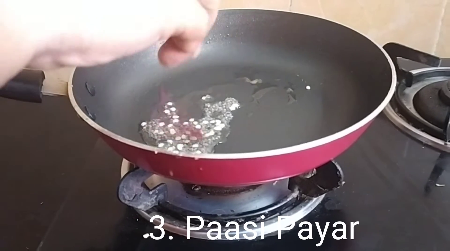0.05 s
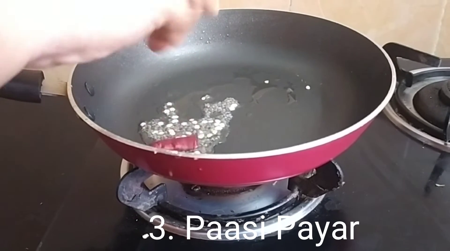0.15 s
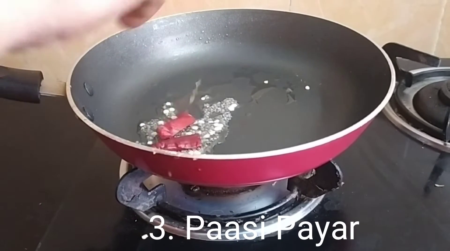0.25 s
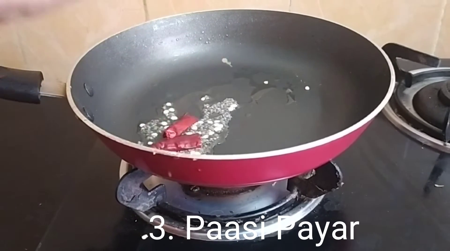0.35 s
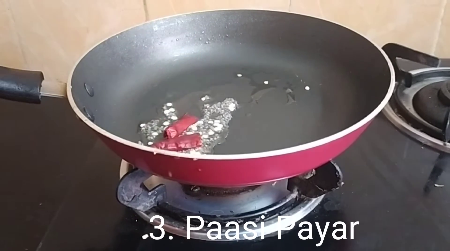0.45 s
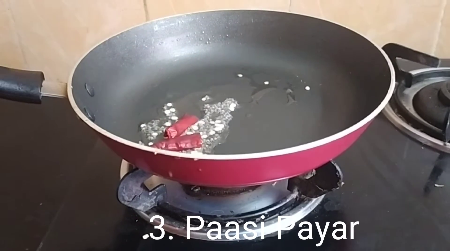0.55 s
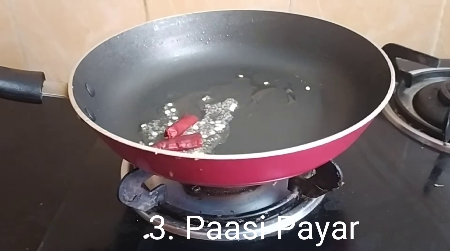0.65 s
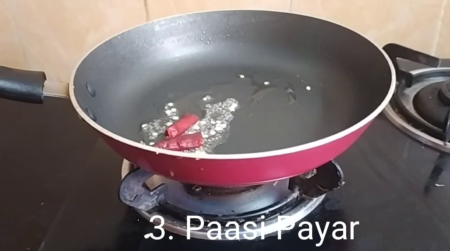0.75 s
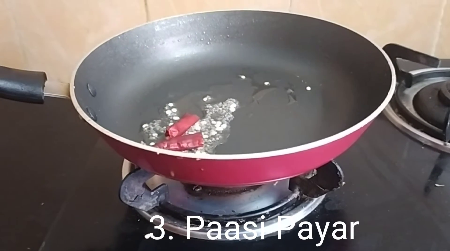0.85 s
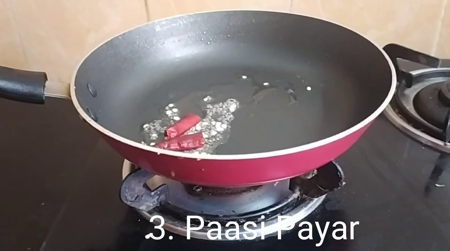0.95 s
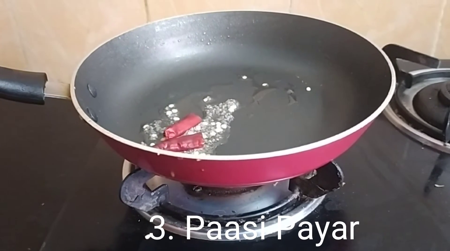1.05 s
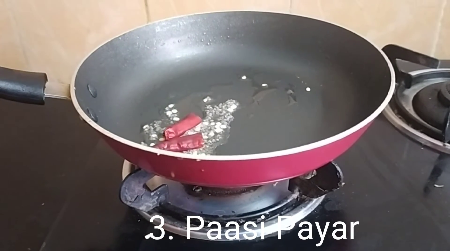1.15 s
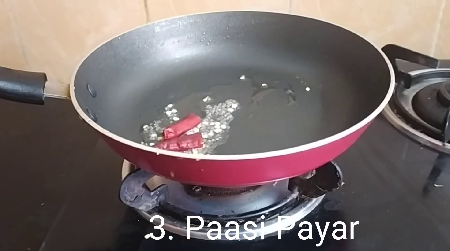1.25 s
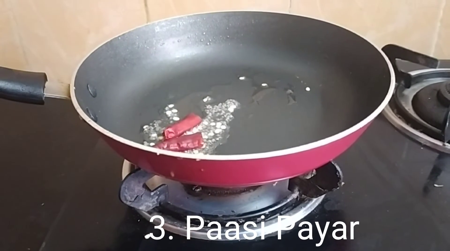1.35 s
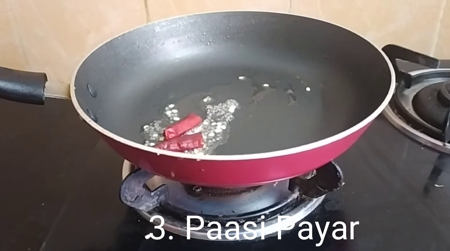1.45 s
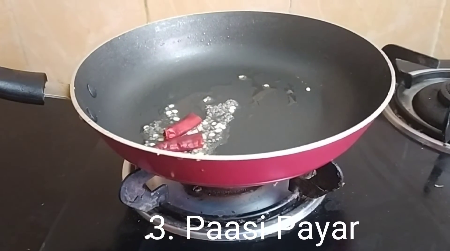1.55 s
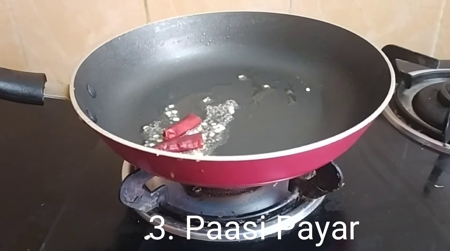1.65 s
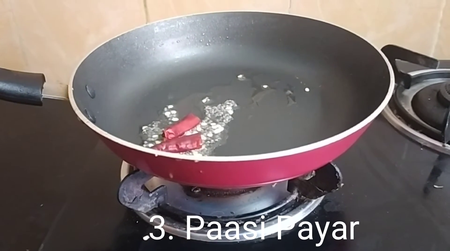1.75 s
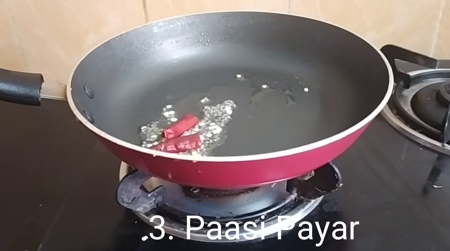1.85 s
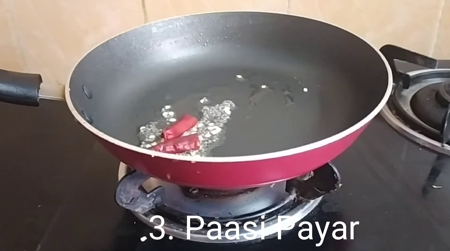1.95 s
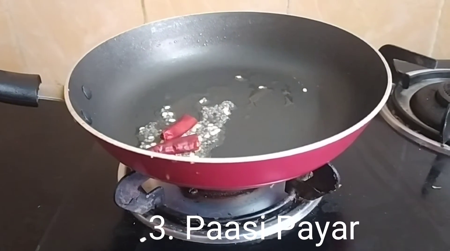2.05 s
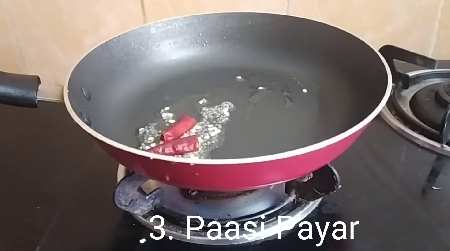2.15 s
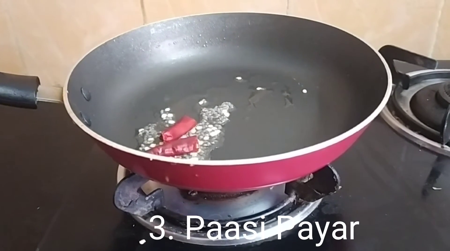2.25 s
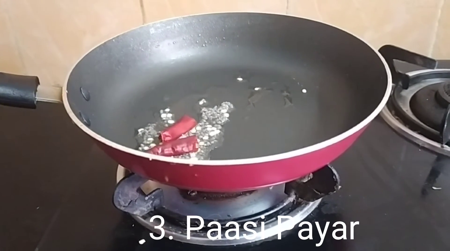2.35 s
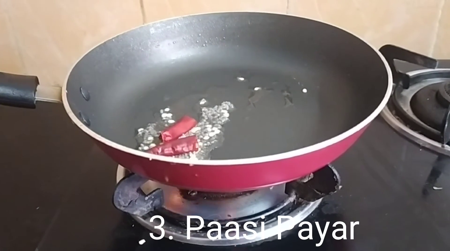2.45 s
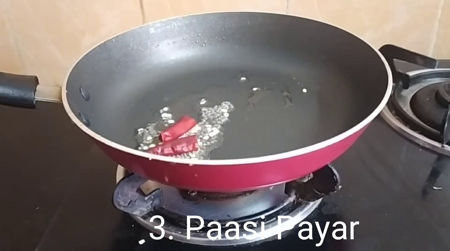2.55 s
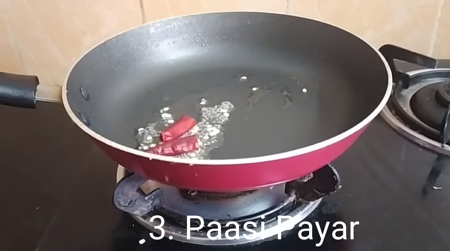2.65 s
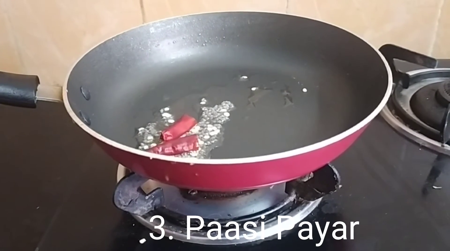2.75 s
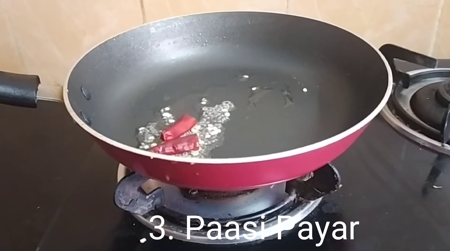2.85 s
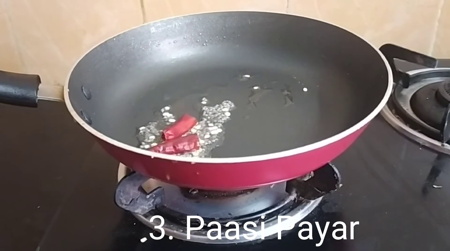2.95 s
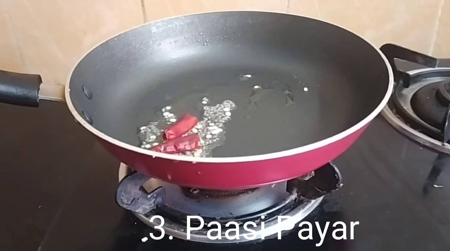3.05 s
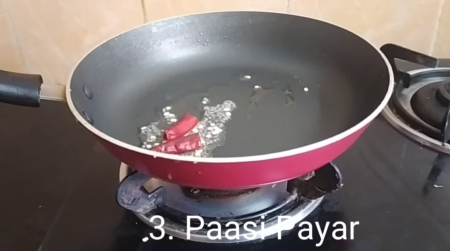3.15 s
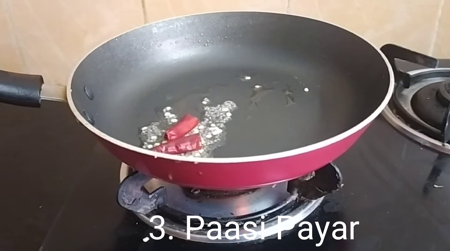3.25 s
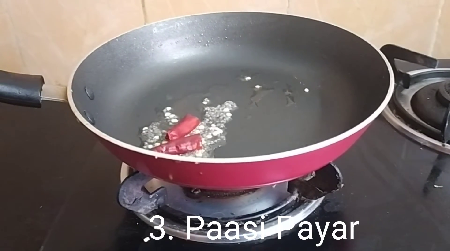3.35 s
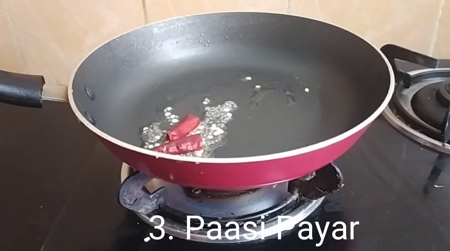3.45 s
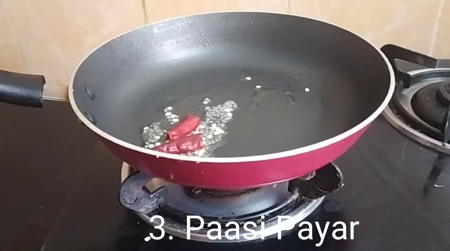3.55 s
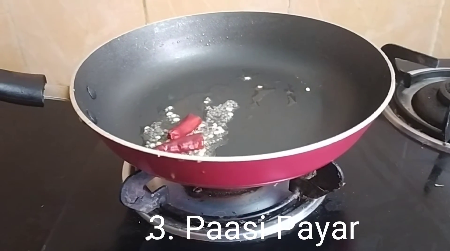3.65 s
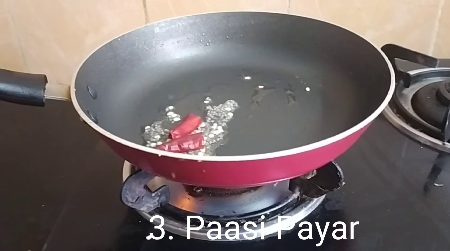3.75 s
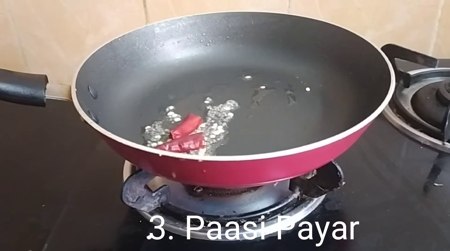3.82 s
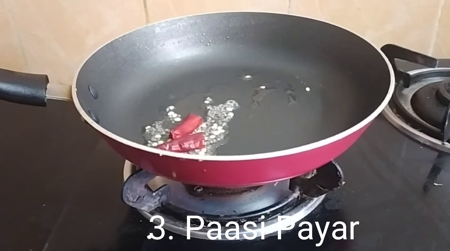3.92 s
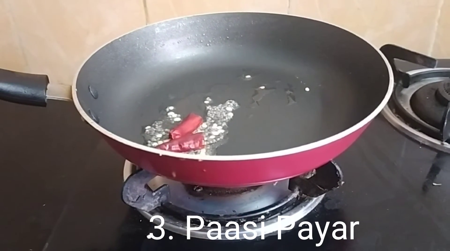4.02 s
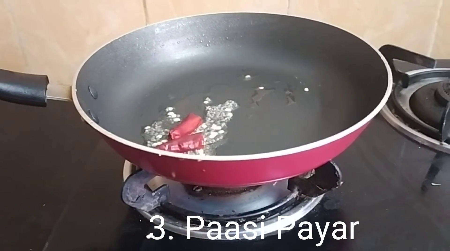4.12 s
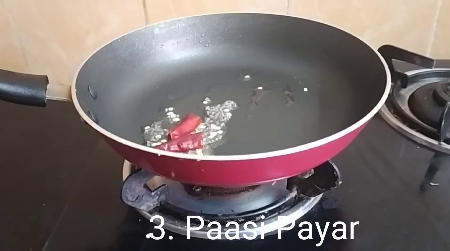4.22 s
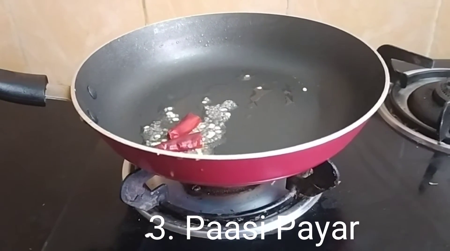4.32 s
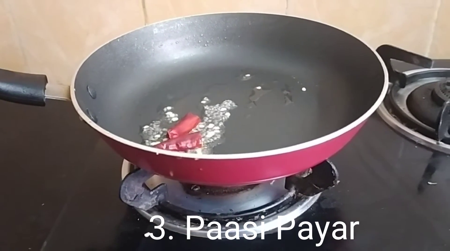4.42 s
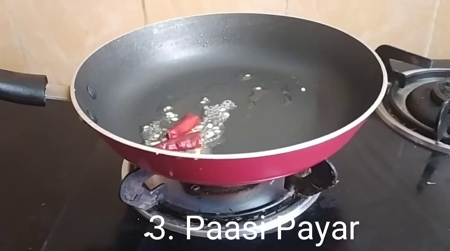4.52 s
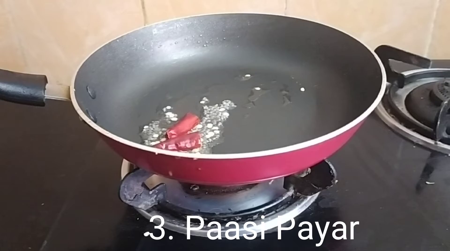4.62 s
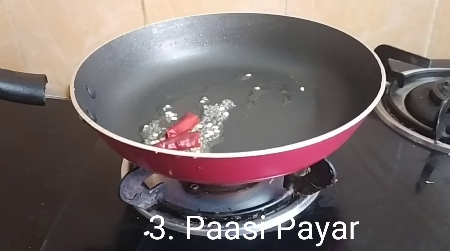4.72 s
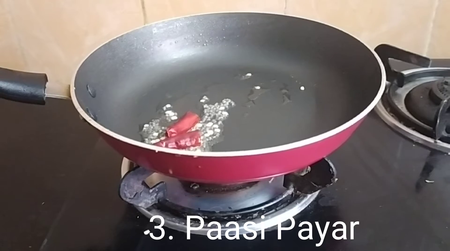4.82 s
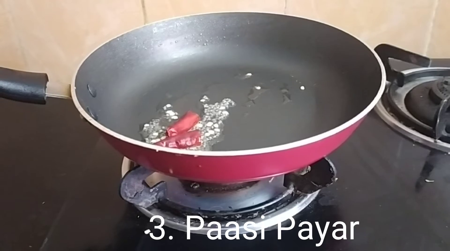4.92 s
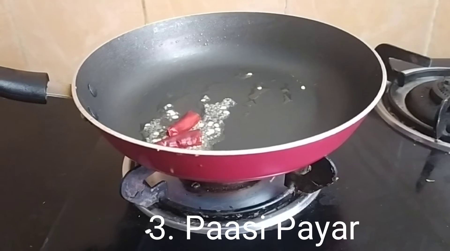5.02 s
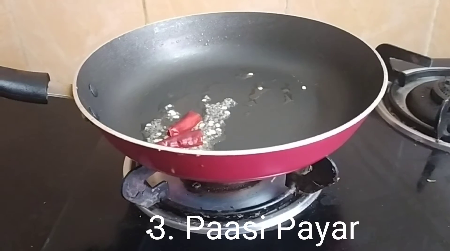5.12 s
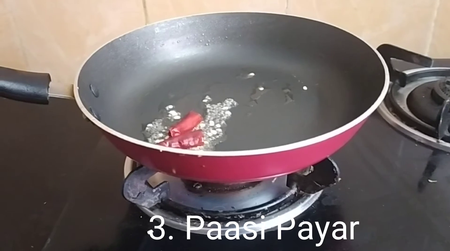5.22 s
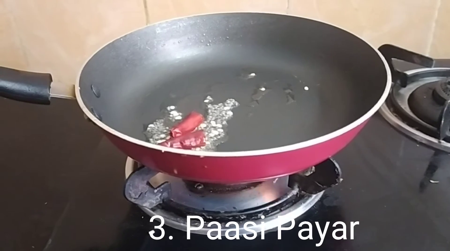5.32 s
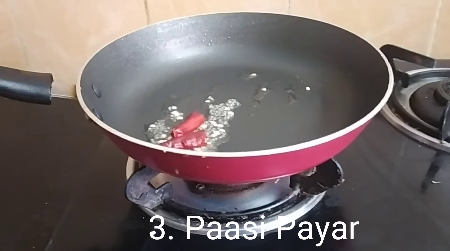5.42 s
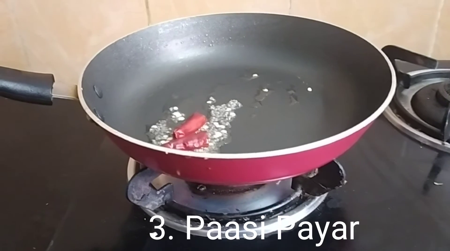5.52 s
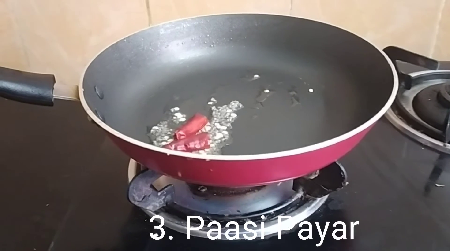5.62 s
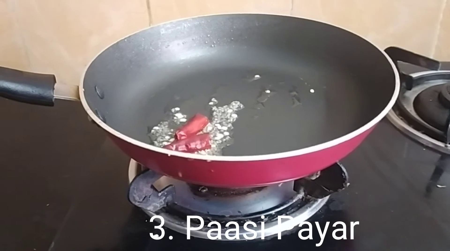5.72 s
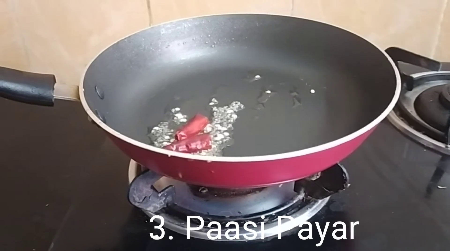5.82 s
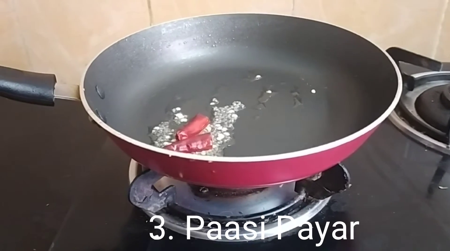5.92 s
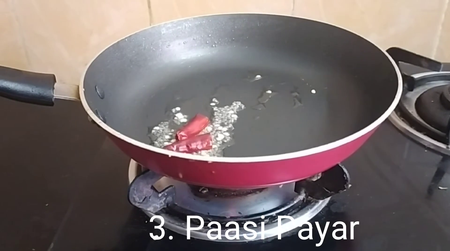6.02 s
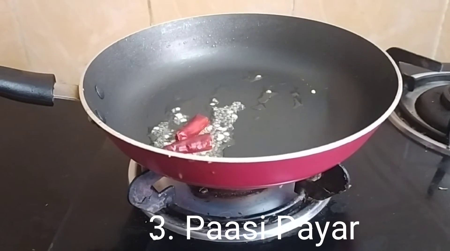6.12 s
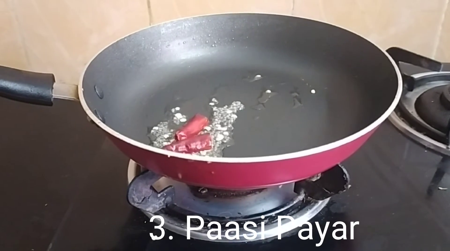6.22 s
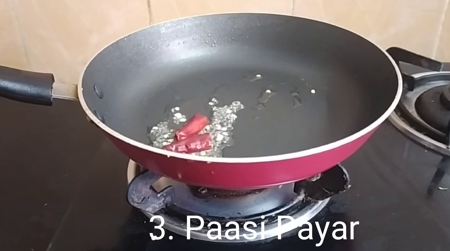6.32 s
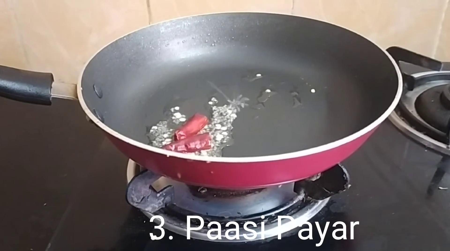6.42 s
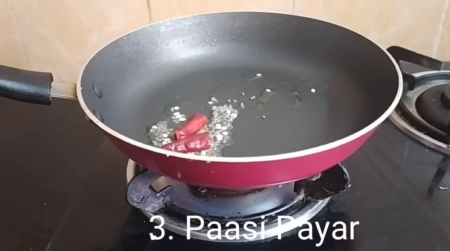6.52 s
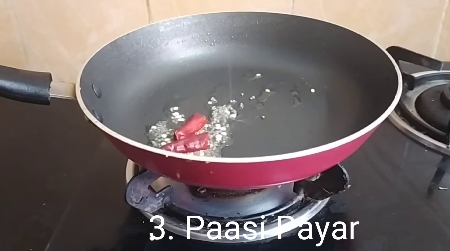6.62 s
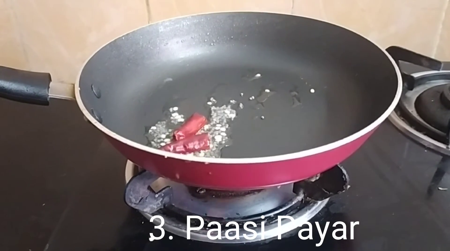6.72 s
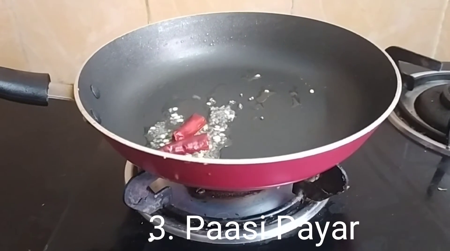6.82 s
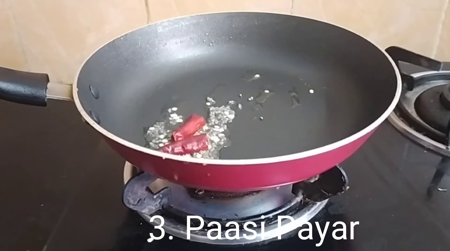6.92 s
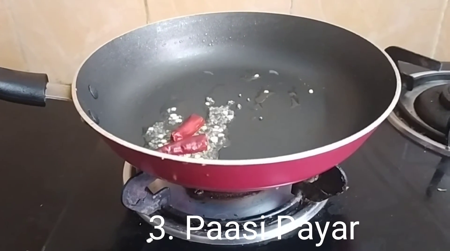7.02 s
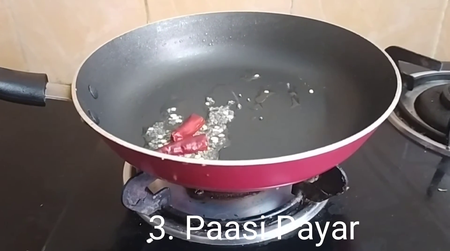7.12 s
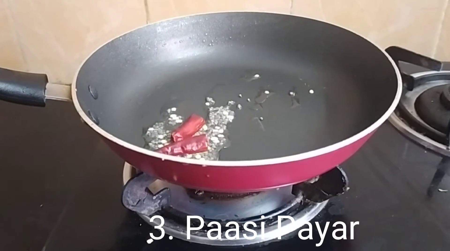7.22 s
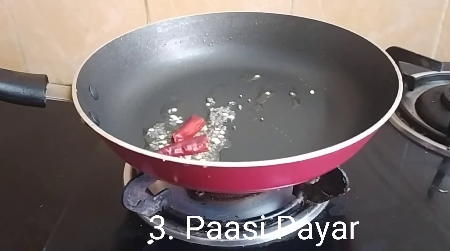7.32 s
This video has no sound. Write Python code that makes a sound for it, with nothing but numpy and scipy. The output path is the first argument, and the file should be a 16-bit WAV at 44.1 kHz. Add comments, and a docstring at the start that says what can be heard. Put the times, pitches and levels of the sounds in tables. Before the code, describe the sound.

Sharp crackles and spitting oil pops over a faint fine sizzle in a frying pan, growing busier and ending with several loud snaps.

```python
"""Steam bubbles burst as sharp pops from lentils and dried chillies frying in a little oil on a gas stove.
Each pop is a millisecond noise crack in six bands; thrown drops patter back, and each pop rings the pan's modes.
Steam whistles and short pan hums are narrow-band noise; tiny bubbles make a fine fizz of patchy noise and ticks.
The flame rumbles, flutters and moans in filtered noise. In the tiled kitchen a near wall throws each pop
back before the room tail."""
import sys
import numpy as np
from scipy import signal
from scipy.fft import rfft, irfft
from scipy.io import wavfile
from scipy.ndimage import uniform_filter1d

SR = 44100
rng = np.random.default_rng(int(sys.argv[2]) if len(sys.argv) > 2 else 0)


def log_audio(samples):
    """Write samples as a 16-bit WAV file to the path given in sys.argv[1]."""
    # one column per channel
    frames = np.atleast_2d(samples).T
    # limit to full scale, then quantise
    limited = np.clip(frames, -1, 1)
    pcm = np.round(limited * 32767).astype(np.int16)
    wavfile.write(sys.argv[1], SR, pcm)


N = 324840

# Levels are relative dB; spectra are shapes, normalised on use.

# Bursting bubbles. Each row: burst time in seconds, spray level in dB, top of the spray over it in dB,
# body level in dB, body tilt in dB per octave (falling for big bubbles, rising for small),
# level of the sharp crack in dB (lower for soft sputters with a weak onset),
# blow on the pan over the low body in dB.
POPS = [(0.0333, -43, -16, -57, 3, 9, 6), (0.1095, -28, -7, -33, 8.5, -2.5, 0.5),
        (0.1386, -29, 0, -48, -10, -0.5, -0.5), (0.1735, -42, -3, -53, -9, -8, 1),
        (0.7734, -60, -7, -49, 10, -1, -4), (0.8072, -34, -4, -49, 2, 0.5, -7),
        (1.0764, -44, -6, -45.5, -1, -8, -10), (1.1356, -36, -4, -41.5, -3.5, -1.5, -3),
        (1.2213, -52, -9, -57, 21, 7, -8), (1.2532, -38.5, 6, -58.5, -8, 3.5, -2),
        (1.3024, -36, 4, -52, -3.5, 1, -1.5), (1.3926, -41, -22, -45.5, 4.5, 2, 0.5),
        (1.4109, -59, -8, -48, 5, 5, 1), (1.4252, -44.5, 5, -56, -4, 6.5, -3),
        (1.4635, -41, 12, -55, -1, -1, -5), (1.5768, -41.5, -8, -56, 6, 1.5, -8),
        (1.6062, -46, -14, -45.5, 5.5, 2.5, 1.5), (1.6347, -44, 7, -68, 4, -3, -8),
        (1.816, -43, 3, -62, 3, -2, -8), (2.008, -40, -1, -57, 10, 2, -8),
        (2.0313, -38.5, 11.5, -53, 5, 0, -6), (2.3136, -37, -22, -58, 4, -0.5, -8),
        (2.3875, -20.5, -4, -37.5, 8, -0.5, -10), (2.58, -53, -5, -35, 2, -13, -11),
        (2.7826, -39.5, 1, -46, 11.5, -8, 2), (2.9422, -36, -4, -57, 19, 2, -8),
        (3.1078, -32.5, 0.5, -48.5, 14, -0.5, -8), (3.1991, -38.5, 5.5, -36, 8, 0.5, -1.5),
        (3.2384, -37, -3, -62, 1, 1.5, -8), (3.2896, -31, -8, -32.5, -14.5, -0.5, -8.5),
        (3.4402, -32, -15, -62, -5, -4, -8), (3.463, -36, -2, -47, -4, -5.5, -8),
        (3.5537, -42, -16, -43, -9, -5, -10.5), (3.6972, -41.5, -15, -49, 6, 2, -2),
        (3.9559, -32.5, -15, -69, -5, -2.5, -10), (4.082, -34.5, -7, -52.5, 5, 1.5, -5),
        (4.2034, -30, -26, -41, 8, -1, -3), (4.4548, -44, 1, -50, -11.5, -3.5, -8.5),
        (4.6262, -31.5, -1, -47.5, 9, -2.5, -3), (4.761, -46, -11, -35, -5, -8, -8),
        (4.8299, -23, -10, -35.5, 3, -0.5, -12), (4.8504, -47, -8, -44.5, -2, -1, -5),
        (4.873, -30.5, -8, -51, 3, 2, -8), (4.9727, -26.5, -13, -36, -7.5, -10, -13.5),
        (5.2024, -33.5, 2, -55.5, -6, -1.5, -5), (5.2524, -38, 1, -49.5, -14, -5.5, -11.5),
        (5.3317, -40, -11, -42, -3.5, 0, -9.5), (5.3902, -32, 0.5, -45.5, 2, 0, -8),
        (5.4822, -39, -9, -52.5, -11, -6, -12), (5.5548, -34, -1, -41.5, 2.5, 0, -10),
        (5.6865, -38, -18, -53.5, -22, -5.5, -21), (5.7848, -41, -8, -53, -7, -8, -8),
        (5.8368, -39.5, 4.5, -35.5, 5, 1.5, -8.5), (5.881, -40, -2, -53, -6, 2, -8),
        (5.917, -36, 5, -51, -13, -3, -13), (5.9594, -43, 0, -53, -18, -4, -14),
        (6.127, -34.5, -1, -53, 4, 3.5, -5), (6.1577, -31, -15, -47.5, 7, 1, -11),
        (6.2884, -10, -7.5, -26, -2, -1.5, -14), (6.4745, -10, -9, -24.5, -2, -1, -15),
        (6.728, -44, 1, -48.5, 7, 0, 3), (6.8062, -18.5, -3, -31, 1.5, 0.5, -11),
        (6.9494, -56, -8, -54, -8, -2, -5), (7.08, -39, -9, -57, -2, -6, -8),
        (7.1468, -10.5, -16, -24.5, 1, 0.5, -19), (7.316, -19.5, 3, -29.5, 3.5, 1.5, -17)]
# Pop bands: puff, three of body, spray, top of the spray. Each row: low edge in Hz, high edge in Hz.
BAND_EDGES_HZ = [(40, 1000), (1000, 3000), (3000, 4700), (4700, 6500), (6500, 11500), (11500, 17000)]
# Spectrum of a pop. Each row: frequency in Hz, density in dB per Hz.
POP_COLOUR = [(60, -31), (500, -34), (1100, -31), (2250, -16.5), (2750, -18), (3300, -17), (4100, -4),
              (5200, -3), (9000, 4.5), (11500, 2), (13500, -13.5), (16600, -26), (17200, -60)]
# The three body bands, in octaves from the middle of the body.
BODY_OCTAVES = np.log2(np.array([2200, 3900, 5600]) / 3600)
# Near wall echoes. Each row: delay in seconds, level in dB. The first path is four metres further.
ECHOES = [(.0119, 3), (.0215, -7), (.037, -6)]
# Share of each pop band that the walls throw back, as amplitude ratios.
WALL_SHARES = np.array([0.79, 0.062, 0.13, 0.31, 0.75, 0.41])
# Modes of the pan bottom. Each row: frequency in Hz, level in dB, t60 in seconds.
PAN_MODES = [(760, -45, 0.22), (1448, -18, 0.14), (2273, -10.5, 0.15), (2440, -13, 0.16),
             (3473, -3.5, 0.043), (4005, -1, 0.023), (4050, -29, 0.016)]
# Steam whistles and sputters, and short narrow hums of the ringing pan.
# Each row: start in seconds, length in seconds, pitch in Hz, width in Hz, level in dB.
WHISTLES_AND_HUMS = [(0.111, 0.019, 5950, 3950, -43), (0.111, 0.059, 760, 60, -60),
                     (2.146, 0.016, 8160, 302, -53.5), (2.548, 0.088, 2180, 603, -54.5),
                     (2.966, 0.029, 7900, 300, -51.5), (3.46, 0.11, 7900, 300, -62.5),
                     (4.017, 0.052, 8100, 300, -56), (4.867, 0.063, 7850, 300, -48),
                     (4.97, 0.027, 2220, 1500, -49), (4.971, 0.021, 9700, 3500, -41.5),
                     (5.256, 0.038, 7870, 300, -51), (5.3, 0.021, 8240, 300, -39),
                     (5.28, 0.064, 12000, 400, -52), (5.422, 0.036, 7950, 300, -53),
                     (5.679, 0.032, 2020, 500, -61.5), (5.951, 0.032, 1493, 60, -62.5),
                     (6.562, .18, 8180, 500, -50), (7.092, 0.032, 8230, 352, -37.5)]
# Fizz level. Each row: time in seconds, level in dB.
FIZZ_LEVEL = [(0.0, -48), (0.31, -57), (1.2, -54), (1.82, -56.5), (2.48, -54), (3.55, -56.5), (4.1, -54),
              (4.4, -57), (4.84, -53.5), (5.56, -57), (6.22, -53.5), (6.73, -54.5), (6.89, -60.5),
              (7.14, -53), (7.37, -50)]
# Spectrum of the fizz. Each row: frequency in Hz, density in dB per Hz.
FIZZ_COLOUR = [(530, -89), (900, -19), (1780, -15), (2280, -10), (3090, -19), (4100, -9.5), (4690, -14),
               (6680, -4.5), (7360, -10), (10100, -2), (11700, -8), (13600, -21), (15500, -19),
               (16100, -42), (16700, -50)]
# Flame roar. Each row: time in seconds, level in dB.
ROAR_LEVEL = [(0.0, -66.5), (1.1, -67.5), (1.41, -69.5), (1.7, -70), (2.4, -61), (2.85, -70), (3.1, -63.5),
              (3.9, -69.5), (5.8, -70), (7.37, -68)]
# Spectrum of the flame rumble. Each row: frequency in Hz, density in dB per Hz.
RUMBLE_COLOUR = [(15, -5), (28, 2.5), (50, -11), (113, -13.5), (248, -16.5), (400, -22), (530, -31),
                 (760, -21.5), (1060, -36), (1500, -22.5), (2500, -81)]
# Faint wavering hums. Each row: pitch in Hz, width in Hz, level in dB.
STEADY_HUMS = [(38.3, 10, -71.5), (71.8, 7.3, -74), (176, 18, -75.5), (247.3, 13, -76), (797, 5.6, -83.5)]
# Gusts that ruffle the gas flame. Each row: start in seconds, length in seconds, level in dB.
GUSTS = [(1.123, .13, -61.5), (1.934, 0.063, -68), (2.159, 0.094, -61), (2.294, 0.096, -56.5),
         (3.041, 0.067, -61.5), (3.138, 0.13, -60.5), (3.434, 0.14, -65.5), (4.972, 0.071, -63.5),
         (5.498, 0.083, -54), (5.56, 0.085, -60.5), (5.847, 0.16, -69.5)]
# Flame moans. Each row: start in seconds, length in seconds, pitch in Hz, level in dB.
MOANS = [(2.17, 0.21, 312, -57), (2.19, 0.16, 180, -58), (2.82, 0.14, 184, -63), (3.09, 0.14, 183, -59.5)]
# Room tail. Each row: frequency in Hz, t60 in seconds, level in dB.
KITCHEN = [(500, 0.73, -3), (1500, 0.38, -0.5), (3500, 0.43, 1), (9700, 0.44, 6), (12000, 0.53, 1),
           (16200, 0.49, 5)]

PRE_S = .002  # lead-in before a burst
PUFF_DB, ECHO_DB = -24.5, -6  # puff under the spray; wall under the pop
DULL_OCTAVES = .8  # extra fall at the top of a big bubble's body
DROPS_PER_S, DROPS_DB, DROPS_FADE_S, FLIGHT_S = 300, -17, 0.044, .011
RUMBLE_DB = -67.5
GUST_LO_HZ, GUST_HI_HZ = 265, 760
MOAN_WIDTH = 0.042  # half width, share of the pitch
EDGE_HZ = 16750


def gain_of(db):
    """Amplitude ratio of a level in dB."""
    return 10 ** (np.asarray(db) / 20)


def evened(x):
    """Scales x to rms 1."""
    return x / np.sqrt(np.mean(x ** 2, axis=-1, keepdims=True) + 1e-20)


def read(points, hz):
    """Interpolates (Hz, value) points over log frequency."""
    f, value = np.transpose(points)
    return np.interp(np.log(hz + 1), np.log(f + 1), value)


def follow(rows, column):
    """Interpolates a column of timed rows at every sample."""
    rows = np.asarray(rows)
    return np.interp(np.arange(N) / SR, rows[:, 0], rows[:, column])


def add(mix, s, sound):
    """Adds sound to mix at s seconds, cut at the end."""
    part = mix[round(s * SR):][:len(sound)]
    part += sound[:len(part)]


def band(hz, lo_hz, hi_hz, steep):
    """Gain of a band with sloping edges."""
    return 1 / np.sqrt((1 + (lo_hz / (hz + 1)) ** steep) * (1 + (hz / hi_hz) ** steep))


def coloured(x, gain):
    """Filters x by a gain that is a function of frequency; rms 1."""
    hz = np.fft.rfftfreq(x.shape[-1], 1 / SR)
    return evened(irfft(rfft(x) * gain(hz), x.shape[-1]))


def resonate(x, hz, width):
    """Shifts hz down to zero, smooths twice, and shifts back; rms 1."""
    turn = np.exp(2j * np.pi * hz * np.arange(len(x)) / SR)
    r = np.exp(-np.pi * width / SR)
    smooth = signal.lfilter([1], np.poly([r, r]), x / turn)
    return evened((turn * smooth).real)


def pops():
    """Each burst is a millisecond crack with a short spatter and a puff of pressure.

    Every pop strikes the pan, by its low body level plus its own blow level."""
    t = np.arange(1024) / SR - PRE_S
    attack = (t > 0) * (1 - np.exp(-abs(t) / 0.00029))
    decay = np.exp(-t / 0.00032) + gain_of(-12) * np.exp(-t / 0.0033)  # crack, spatter
    bursts = rng.standard_normal((len(POPS), len(t))) * attack * decay
    click = (np.arange(len(t)) == 110) * 1.
    colours = [lambda hz, edges=edges: band(hz, *edges, 16) * gain_of(read(POP_COLOUR, hz))
               for edges in BAND_EDGES_HZ]
    cracks = gain_of(-18.5) * np.stack([coloured(bursts, colour) for colour in colours], axis=1)
    clicks = gain_of(-17.5) * np.array([coloured(click, colour) for colour in colours])

    chance = rng.standard_normal((len(POPS), len(ECHOES), 2))
    near, spread, blows = np.zeros(N), np.zeros((3, N)), np.zeros(N)
    for k, (s, spray_db, top_db, body_db, tilt_db, crack_db, strike_db) in enumerate(POPS):
        body = body_db + tilt_db * BODY_OCTAVES + [0, 0, DULL_OCTAVES * min(tilt_db, 0)]
        shares = gain_of([spray_db + PUFF_DB, *body, spray_db, spray_db + top_db])
        start = s - PRE_S
        add(near, start, gain_of(crack_db) * shares @ cracks[k])
        # walls answer a little differently for each pop
        for (delay, db), (late, dull) in zip(ECHOES, chance[k]):
            echo = gain_of(ECHO_DB + db + 2.5 * dull) * WALL_SHARES * shares @ cracks[k]
            add(near, start + delay + .0004 * late, echo)
        add(spread[k % 3], start, shares @ clicks)  # summed over all directions, the colour is smooth
        add(blows, start, gain_of(body[0] + strike_db) * click)
    return near, spread, blows


def droplets(bursts):
    """Oil thrown up by a pop lands again as a thinning patter of small ticks."""
    fade = np.exp(-1 / (DROPS_FADE_S * SR))
    delayed = np.r_[np.zeros(round(FLIGHT_S * SR)), bursts][:N]
    thrown = np.sqrt(signal.lfilter([1], [1, -fade ** 2], delayed ** 2))
    ticks = (rng.random(N) < DROPS_PER_S / SR) * rng.standard_normal(N)
    impulse = signal.unit_impulse(128, 'mid')
    tick = coloured(impulse, lambda hz: gain_of(read(POP_COLOUR, hz))) / np.sqrt(128)  # unit energy
    return gain_of(DROPS_DB) * signal.oaconvolve(thrown * ticks, tick, "same")


def pan(blows):
    """The pan bottom rings on its modes after a blow."""
    t = np.arange(SR // 4) / SR
    ring = sum(gain_of(db - 60 * t / t60) * np.sin(2 * np.pi * hz * t) for hz, db, t60 in PAN_MODES)
    return signal.oaconvolve(blows, ring)[:N]


def whistles_and_hums():
    """Steam whistles and sputters, and short narrow hums of the ringing pan: resonant noise, unevenly loud."""
    out = np.zeros(N)
    for s, length, hz, width, db in WHISTLES_AND_HUMS:
        noise, flutter = rng.standard_normal((2, 8192))
        count = round(length * SR)
        unevenness = gain_of(2.4 * evened(uniform_filter1d(flutter, size=110)))
        tone = resonate(noise, hz, width) * unevenness
        add(out, s, gain_of(db) * evened(tone[:count]) * signal.windows.tukey(count, .15))
    return out


def fizz():
    """Countless tiny bubbles: a dense patchy noise bed, with larger ticks in three pitch bands standing out."""
    colour = lambda hz: gain_of(read(FIZZ_COLOUR, hz))
    sizes = gain_of(9.4 * np.minimum(rng.exponential(1, (3, N)), 2.5))
    trains = sizes * (rng.random((3, N)) < 25. / SR)  # 25 ticks per second in each band
    ticks = sum(coloured(train, lambda hz: colour(hz) * band(hz, *edges, 6.3))
                for train, edges in zip(trains, BAND_EDGES_HZ[3:]))

    z = signal.stft(coloured(rng.standard_normal(N), colour), nperseg=512)[2]
    patches = uniform_filter1d(rng.standard_normal(z.shape), size=5, axis=0)
    patches = uniform_filter1d(patches, size=8, axis=1)
    bed = signal.istft(z * gain_of(3.5 * patches / patches.std()), nperseg=512)[1][:N]
    level = gain_of(follow(FIZZ_LEVEL, 1))
    return gain_of(-18.5) * level * ticks, level * evened(bed)


def flame():
    """Steady rumble and hums, a low roar that swells, dull puffs when a gust ruffles the flame, and short moans."""
    noise = rng.standard_normal((2 + len(STEADY_HUMS), N))
    rumble = gain_of(RUMBLE_DB) * coloured(noise[0], lambda hz: gain_of(read(RUMBLE_COLOUR, hz)))
    roar = gain_of(follow(ROAR_LEVEL, 1)) * coloured(noise[1], lambda hz: band(hz, 140, 238, 2.92))
    hums = sum(gain_of(db) * resonate(air, hz, width) for air, (hz, width, db) in zip(noise[2:], STEADY_HUMS))

    rows = [(s, length, GUST_LO_HZ, GUST_HI_HZ, db) for s, length, db in GUSTS]
    rows += [(s, length, hz * (1 - MOAN_WIDTH), hz * (1 + MOAN_WIDTH), db) for s, length, hz, db in MOANS]
    puffs = np.zeros(N)
    for s, length, lo_hz, hi_hz, db in rows:
        air = coloured(rng.standard_normal(16384), lambda hz: band(hz, lo_hz, hi_hz, 16.5))
        count = round(length * SR)
        add(puffs, s, gain_of(db) * evened(air[:count]) * signal.windows.tukey(count, .45))
    return rumble + roar + hums + puffs


def kitchen(spots):
    """A tail for each spot in the pan: sparse random taps that build up, each band dying at its own speed."""
    taps = np.zeros((len(spots), SR // 2))
    jitter = rng.integers(0, 10, (len(spots), (SR // 2 - 11) // 10))
    at = np.arange(0, SR // 2 - 20, 10) + jitter
    heights = rng.choice([-1., 1.], at.shape) * gain_of(1.35 * rng.standard_normal(at.shape))
    np.put_along_axis(taps, at, heights, 1)

    hz, t, z = signal.stft(taps, SR, nperseg=256)
    centres, t60s, dbs = np.transpose(KITCHEN)
    t60 = read(np.c_[centres, t60s], hz)[:, None]
    band_db = read(np.c_[centres, dbs], hz)[:, None]
    tail = signal.istft(z * gain_of(band_db - 60 * t / t60), SR, nperseg=256)[1]

    t = np.arange(tail.shape[1]) / SR
    tail = tail * (.4 + .6 / (1 + np.exp(-(t - .0105) / .0007)))  # weak until the first walls answer
    lumps = uniform_filter1d(rng.standard_normal(tail.shape), size=60, axis=1)
    tail = tail * gain_of(3.0 * evened(lumps) * np.exp(-t / 0.14))  # early reflections arrive in clumps
    tail = tail / np.linalg.norm(tail, axis=1, keepdims=True)
    return signal.fftconvolve(spots, tail, axes=1)[:, :N].sum(0)


def scene():
    """Sums the direct sounds, the room tail, the fizz bed and the flame; the last two get no tail."""
    near, spread, blows = pops()
    ticks, bed = fizz()
    others = np.array([pan(blows), whistles_and_hums(), ticks])
    direct = near + droplets(spread.sum(0)) + others.sum(0)
    tail = gain_of(-1.5) * kitchen(spread + others)  # one of the others joins each spot
    return (direct + tail + bed + flame())[None]


def record(dry):
    """The band limit of the recorder: a linear-phase low-pass at EDGE_HZ."""
    lowpass = signal.firwin(255, EDGE_HZ, window=("kaiser", 9), fs=SR)
    return signal.oaconvolve(dry, lowpass[None], "same")


dry = scene()
out = record(dry)
log_audio(out)
```